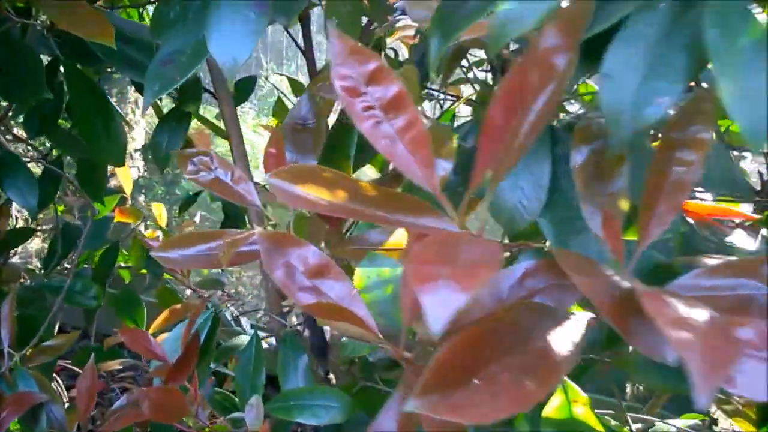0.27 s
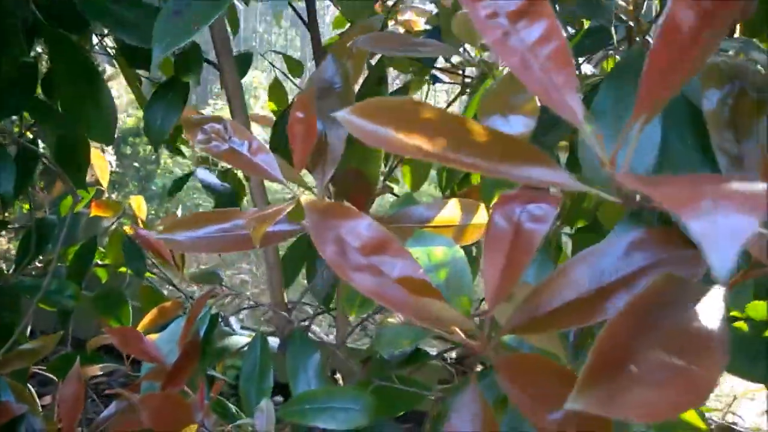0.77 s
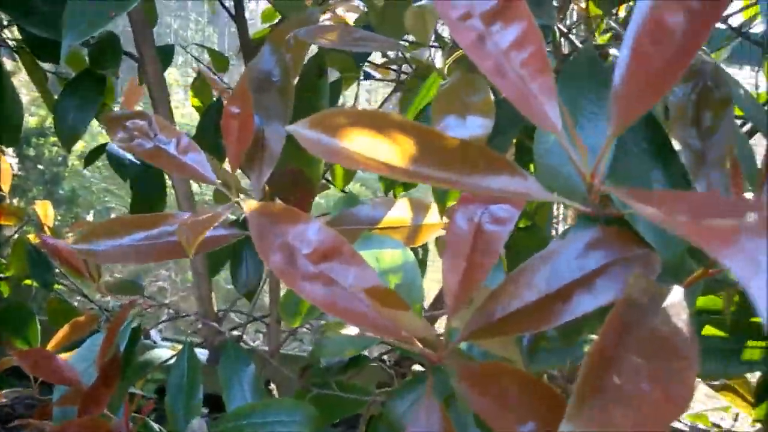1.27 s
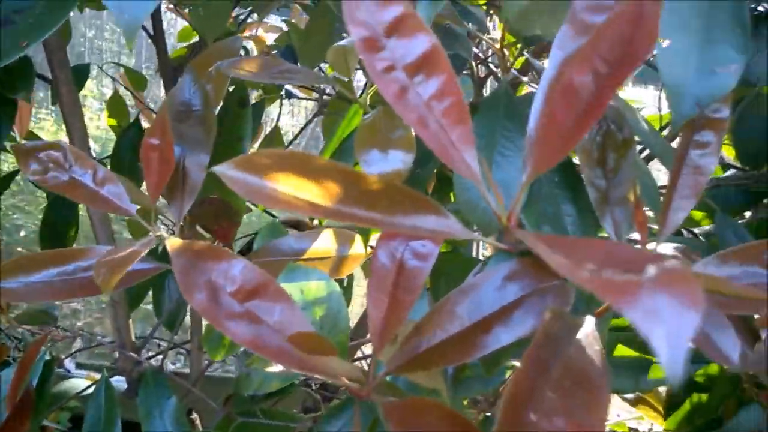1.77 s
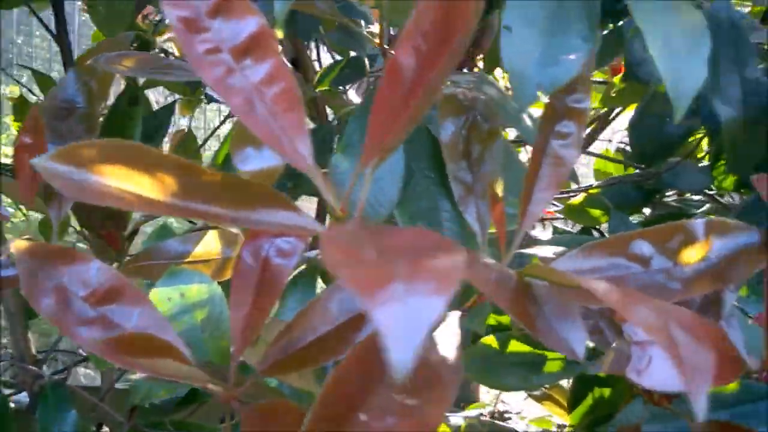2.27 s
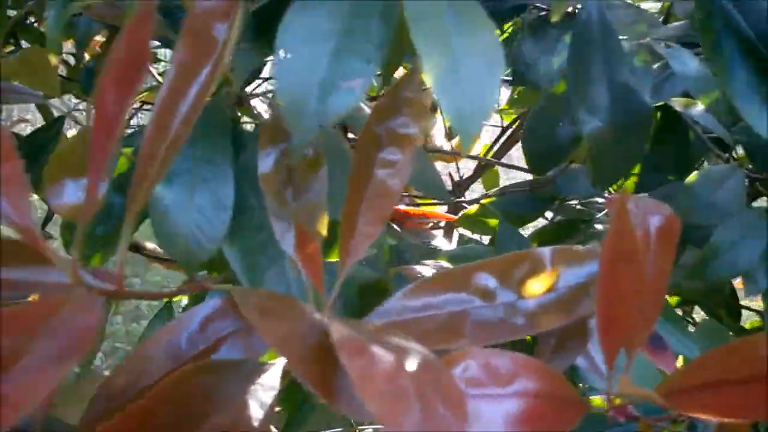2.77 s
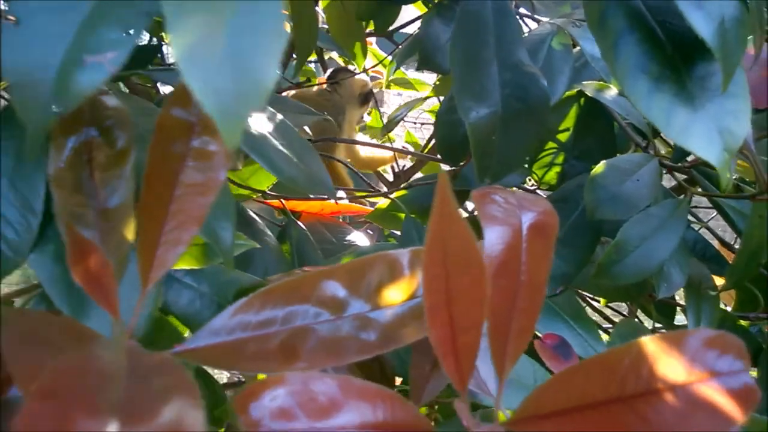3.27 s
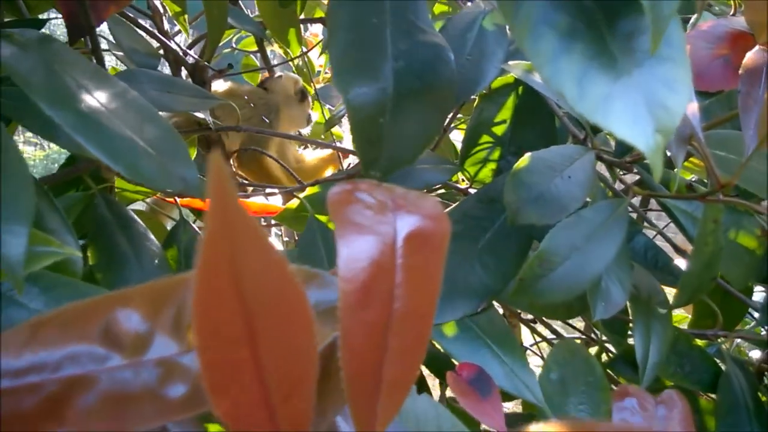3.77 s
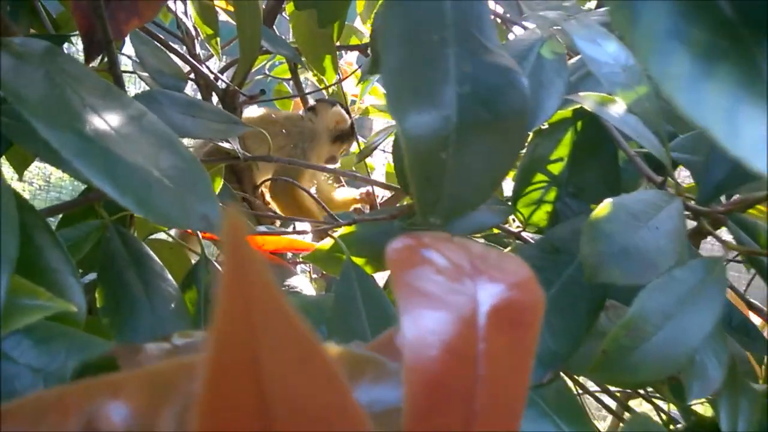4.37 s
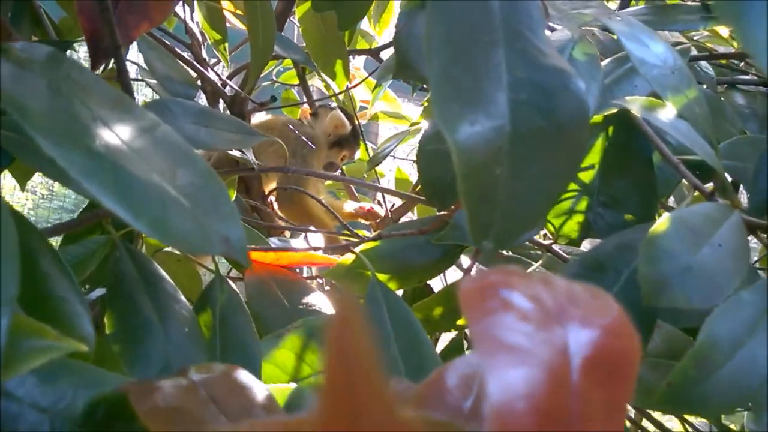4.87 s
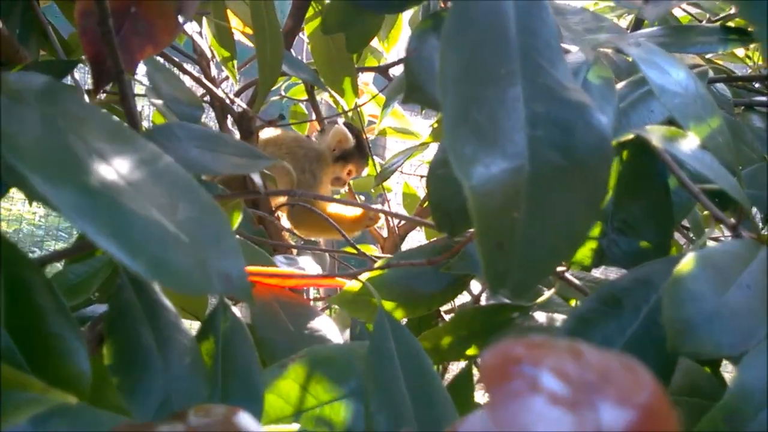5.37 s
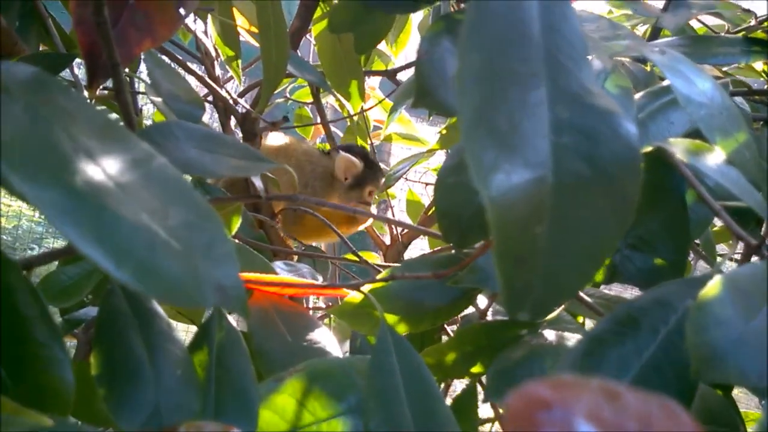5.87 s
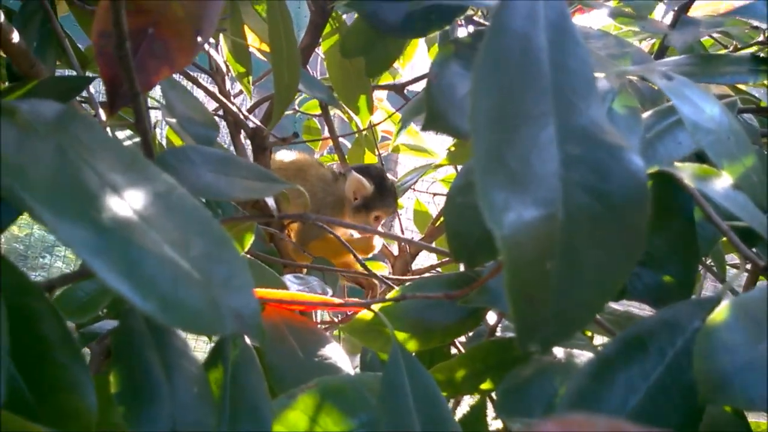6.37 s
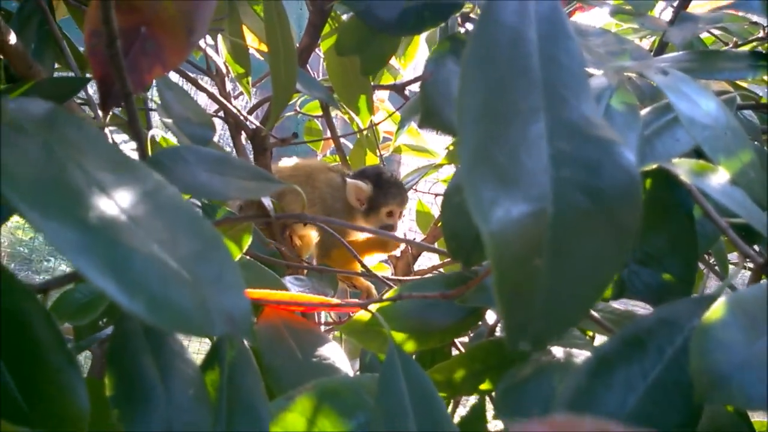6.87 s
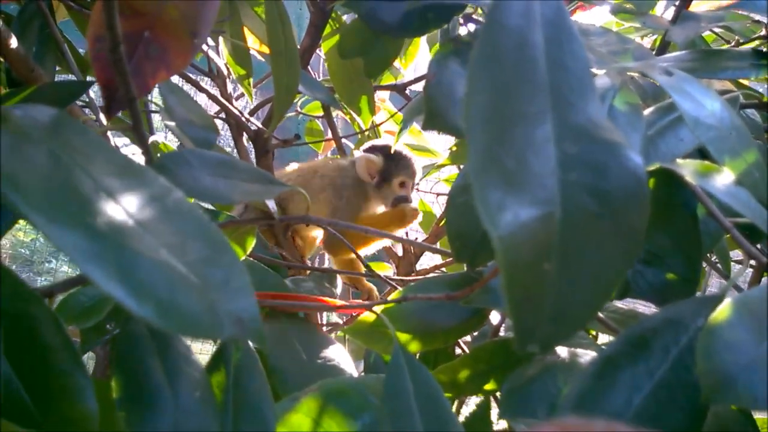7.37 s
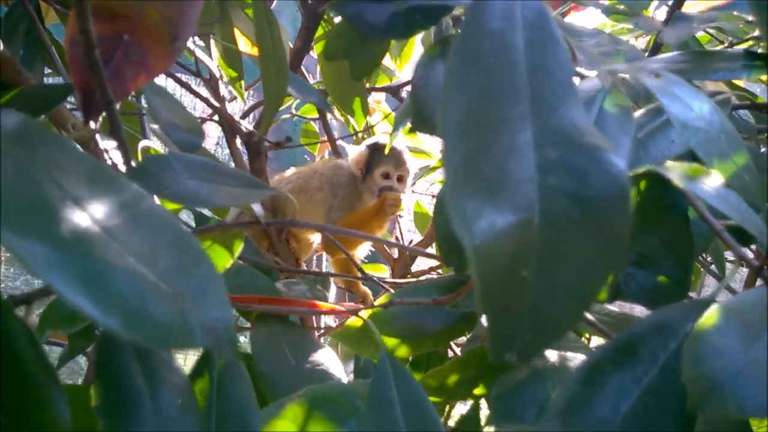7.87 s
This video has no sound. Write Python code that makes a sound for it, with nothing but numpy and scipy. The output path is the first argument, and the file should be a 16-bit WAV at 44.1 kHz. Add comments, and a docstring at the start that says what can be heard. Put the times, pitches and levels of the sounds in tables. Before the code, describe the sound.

A steady, wide outdoor rush with soft low rumble lies under everything, with a far twittering chorus blurred by trees. At 0.4 s a twig ticks, and around 0.55-0.8 s a bright high whistle swoops up, dips and flicks upward on the right. A short mew follows at 0.8 s and a thin whistle at 1 s. The rumble swells gently near 1.7 s; a sharp twig tick comes at 1.9 s. From 2.1 to 3.6 s a fast, grainy trill pulses about sixteen times a second, while a round low hoot at 2.45 s, a strong nasal buzz at 2.7-3.2 s and another hoot at 3.2 s overlap it. Crisp chips and whistles fill 3.5-4.8 s, with a short high swoop at 4.2 s. A faint mew and another swoop arrive at 5.6-5.9 s, then weaker scattered chirps until 8 s. Echoes suggest dense foliage.

```python
"""A steady outdoor rush and far chorus open the scene; a twig ticks, then a high whistle swoops.
Calls in dense foliage, most of them probably birds, follow: whistles, mews, hoots, buzzes, chips, a fast trill.
Voices are sines with drawn pitch and level; frequency and amplitude modulation makes the buzzes and trill.
Twigs are noise bursts in a resonance, the rush is shaped noise, and decaying noise spreads echoes of the trees."""
import sys
import numpy as np
from scipy import signal
from scipy.fft import rfft, irfft
from scipy.io import wavfile
from scipy.ndimage import uniform_filter1d

SR = 44100
rng = np.random.default_rng(int(sys.argv[2]) if len(sys.argv) > 2 else 0)


def int16_out(signal):
    """Quantize to a 16-bit WAV file."""
    q = np.round(np.clip(np.atleast_2d(signal).T, -1, 1) * 32767)
    wavfile.write(sys.argv[1], SR, q.astype(np.int16))


N = 358974
TIME = np.arange(N) / SR

# the note and the rasp of the trill share one pulse clock, with a pulse at the accent
TRILL_RATE_HZ, TRILL_ACCENT_S = 15.9, 3.49
TRILL_START_S, TRILL_LENGTH_S, TRILL_RELEASE_S = 2.12, 1.475, 0.07


def undb(db):
    """Convert level in decibels to amplitude, a factor of ten per 20 dB."""
    return 10 ** (np.asarray(db) / 20)


def unit(x):
    """Normalise the root-mean-square amplitude to 1."""
    return x / np.sqrt(np.mean(x ** 2))


def walk(rate, size):
    """Low-frequency random modulation: linearly joined Gaussian values, rate per second, spread near 1."""
    k = max(int(SR / rate), 1)
    steps = np.repeat(rng.standard_normal(size // k + 1), k)
    return 1.3 * uniform_filter1d(steps, k)[:size]


def along(points, hz):
    """Interpolate (frequency [Hz], value) points on a logarithmic frequency axis."""
    f, value = np.transpose(points)
    return np.interp(np.log(hz + 1), np.log(f), value)


def bend(u, first, middle, last):
    """Pitch glide: the parabola through the first, middle and last pitch [Hz]."""
    return np.polyval(np.polyfit([0, .5, 1], [first, middle, last], 2), u)


def tone(hz):
    """Sine oscillator: phase is the running integral of instantaneous frequency."""
    return np.sin(2 * np.pi * np.cumsum(hz) / SR)


def envelope(t, attack_s, release_s, edge_db=-20):
    """Amplitude envelope: attack, hold and release in dB below the held level."""
    attack = np.clip(1 - t / attack_s, 0, 1)
    release = np.clip(1 - (t[-1] - t) / release_s, 0, 1)
    return edge_db * (attack + release)


def swell(u, loudest, curve=2.4):
    """Swell shape: distance from the loudest moment of a note, 0 there and 1 at both ends."""
    return np.abs(np.interp(u, [0, np.clip(loudest, .05, .95), 1], [-1, 0, 1])) ** curve


def soft_ends(x, ramp_s=.002):
    """Short ramps at both ends prevent the broadband click of an abrupt edge."""
    t = np.arange(len(x)) / SR
    return x * np.clip(np.minimum(t, t[-1] - t) / ramp_s, 0, 1)


def whistle(hz, db, waver=0.0027, shimmer_db=1.37):
    """Near-pure tone: slight random frequency and amplitude modulation makes it tremble."""
    size = len(hz)
    voice = tone(hz * (1 + waver * walk(180, size)))
    return soft_ends(voice * undb(db + shimmer_db * walk(90.3, size)))


def add(bus, s, x, pan_db, echo_db, echo_side=0.26):
    """Level panning: feed left and right directly (rows 0, 1) and their echoes (rows 2, 3)."""
    tilt = np.array([pan_db, -pan_db]) / 2
    direct = unit(undb(tilt))
    echo = unit(undb(echo_side * tilt)) * undb(echo_db)  # the echo leans less to one side
    sends = np.append(direct, echo)
    i = max(int(s * SR), 0)
    x = x[:max(N - i, 0)]
    bus[:, i:i + len(x)] += sends[:, None] * x


def swoops(onset_db=-19, ease_s=0.049, flick_db=3, flatten=1.2, release_s=0.022, flick_rough_hz=110):
    """Frequency glide: pitch shoots to a crest, dips and, in long calls, flicks upward."""
    # swooping whistles: (crest time [s], rise [s], fall [s], crest to end [s], crest to loudest [s],
    # crest [Hz], flick [Hz], level before the call gain [dB], easing after the loudest moment [dB],
    # left minus right [dB], echo re direct [dB])
    swoop_calls = [ (.593, 0.048, 0.079, .235, 0.0037, 5000, 6500, -21.5, -7.5, -26, -3),
                   (4.228, 0.035, 0.08, 0.08, 0.0046, 6294, 6300, -21, -7.5, -13.5, -1.5),
                   (5.728, .045, .11, .235, 0.042, 5040, 6546, -25.5, -4.5, -27, -2), ]
    start_hz, dip_hz, dip_regain = 4200, 4470, .8  # share of the dip won back before the flick
    flick_after_s, flick_s, flick_sag_hz_per_s = .168, 0.016, 2500
    bus = np.zeros((4, N))
    for s, rise_s, fall_s, end_s, accent_s, crest_hz, flick_hz, db, ease_db, pan_db, echo_db in swoop_calls:
        t = np.arange(-rise_s, end_s, 1 / SR)
        rise = crest_hz + (start_hz - crest_hz) * np.abs(t / rise_s) ** 2.7
        height = .5 + .5 * np.tanh(flatten * np.cos(np.pi * t / fall_s)) / np.tanh(flatten)
        dip = dip_hz + (crest_hz - dip_hz) * height * np.where(t < fall_s, 1, dip_regain)
        since = np.maximum(t - flick_after_s, 0)
        flick = 1 - np.exp(-(since / flick_s) ** 1.3)
        hz = np.where(t < 0, rise, dip) * (1 - flick) + flick_hz * flick
        hz = hz - flick_sag_hz_per_s * since
        attack = onset_db * ((accent_s - t) / (accent_s + rise_s)) ** 2
        ease = ease_db * (1 - np.exp((accent_s - t) / ease_s))
        release = onset_db * np.clip(1 - (end_s - t) / release_s, 0, 1) ** 2
        level = db + np.where(t < accent_s, attack, ease) + flick_db * flick + release
        hz = hz + flick_rough_hz * flick * walk(400, len(t))  # the voice turns hoarse at the top
        add(bus, s - rise_s, whistle(hz, level), pan_db, echo_db)
    return bus


def trill_note(note_hz=4610, sag_hz_per_s=20, dip_hz=90, stray_hz=18, rough_hz=28, throb_db=3,
               uneven_db=2.5, flutter_rate_hz=85, flutter=0.55, echo_db=-5):
    """Amplitude modulation pulses a grainy note, hardest near the end; pitch sags between pulses."""
    note_db, attack_s, middle_sag_db = -33.5, 0.15, 2  # level before the call gain
    climax_s, climax_width_s, climax_db = 3.42, 0.12, 7  # the last pulses stand out
    t = np.arange(int(TRILL_LENGTH_S * SR)) / SR
    size = len(t)
    turn = np.pi * TRILL_RATE_HZ * (TRILL_START_S + t - TRILL_ACCENT_S)
    beat, gap = np.cos(turn) ** 4, np.sin(turn) ** 8
    climax = np.exp(-((TRILL_START_S + t - climax_s) / climax_width_s) ** 2)
    effort_db = -middle_sag_db * np.sin(np.pi * t / TRILL_LENGTH_S) ** 2
    db = note_db + effort_db + envelope(t, attack_s, TRILL_RELEASE_S)
    db = db + beat * (throb_db + climax_db * climax)
    db = db + uneven_db * (1 - beat / 2) * walk(150, size)
    hz = note_hz - sag_hz_per_s * t - dip_hz * gap
    hz = hz + stray_hz * walk(40, size) + rough_hz * walk(300, size)
    grain_cycle = tone(flutter_rate_hz * np.exp(.22 * walk(90, size)))
    grain = 1 + flutter * (1 - climax * beat) * grain_cycle  # the grain clears on the climax pulses
    bus = np.zeros((4, N))
    add(bus, TRILL_START_S, tone(hz) * grain * undb(db), 2, echo_db)
    return bus


def trill_rasp(sweep_hz=140, uneven=.35, stray_hz=90, grain_db=2.5, pulse_db=5.5, pulse_lead_s=0.026,
               echo_db=8):
    """Repeated fast down-sweeps spread into a rasp that surges before each pulse, blurred by leaves."""
    # loudness of the rasp along its sweep: (frequency [Hz], relative level [dB])
    colour = [(4250, -4.5), (4420, 4.5), (4900, 3.5), (5200, -5.5), (5600, -4.5), (6000, 1.5), (6300, 0)]
    low_hz, high_hz, ceiling_hz = 4200, 6130, 6460
    rise_hz_per_s = 220  # the sweeps start higher as the trill goes on
    rasp_db, attack_s, delay_s = -39, 0.019, 0.195  # the rasp joins in after the note
    t = np.arange(int((TRILL_LENGTH_S - delay_s) * SR)) / SR
    start, size = TRILL_START_S + delay_s, len(t)
    cycle = np.cumsum(sweep_hz * np.exp(uneven * walk(110, size))) / SR % 1
    top_hz = high_hz + rise_hz_per_s * t + stray_hz * walk(60, size)
    hz = top_hz + (low_hz - top_hz) * cycle + 60 * walk(200, size)
    db = rasp_db + envelope(t, attack_s, TRILL_RELEASE_S, edge_db=-14)
    pulse_time = start + t + pulse_lead_s - TRILL_ACCENT_S
    db = db + pulse_db * np.cos(2 * np.pi * TRILL_RATE_HZ * pulse_time)
    db = db + along(colour, hz) + grain_db * walk(130, size)
    # the rasp closes between sweeps, and a band-pass holds it to its band
    rasp = tone(hz) * np.sin(np.pi * cycle) ** .5 * undb(db)
    band = signal.butter(10, [low_hz, ceiling_hz], "band", fs=SR, output="sos")
    bus = np.zeros((4, N))
    add(bus, start, signal.sosfilt(band, rasp), 0, echo_db)
    return bus


def buzzes(pan_db=0.0, lead=2.43, shimmer_db=2.5, grit_db=0.7):
    """Joint frequency and amplitude modulation by a second oscillator puts sidebands around a tone."""
    # fluttering calls: (time [s], length [s], settled pitch [Hz], start above it [Hz], flutter rate [Hz],
    # pitch swing [Hz], throb [0-1], roughness [Hz], level before the call gain [dB],
    # fade, growing if negative [dB/s], echo re direct [dB])
    buzz_calls = [ (2.358, 0.61, 4980, -31.5, 68.2, 62, 0.5, 21, -33, -0.5, -1),
                  (2.524, 0.14, 3105, 281.5, 138, 129, 0, 106, -33.5, -22.5, 2),
                  (2.545, 0.12, 3740, 58, 139, 150, 0.2, 80, -41, -3, 2),
                  (2.637, 0.125, 2687, -35, 337, 89.7, 0.35, 3.6, -27.5, 15, -3),
                  (2.744, 0.49, 3226, 191, 327.8, 151, 0.4, 10, -18, 25.5, -1),
                  (3.385, 0.1, 3197, 270, 137, 150, 0.7, 110, -42, 70.5, 12),
                  (3.821, 0.11, 7080, -350, 133, 189, 0.1, 174, -44.5, -72, -2), ]
    settle_s, attack_s, release_s = 0.0355, 0.025, 0.025
    accent_db = 1.5  # the first moment is pushed harder
    bus = np.zeros((4, N))
    for (s, length, pitch_hz, above_hz, rate_hz, swing_hz, throb, rough_hz,
         db, fade_db, echo_db) in buzz_calls:
        t = np.arange(int(length * SR)) / SR
        size = len(t)
        push = np.exp(-t / settle_s)
        hz = pitch_hz + above_hz * push
        gain = undb(db + accent_db * push - fade_db * t + envelope(t, attack_s, release_s))
        flutter_hz = rate_hz * hz / pitch_hz + .25 * rough_hz * walk(120, size)
        cycle = 2 * np.pi * np.cumsum(flutter_hz) / SR
        voice = tone(hz + swing_hz * np.sin(cycle) + rough_hz * walk(400, size))
        throbbing = 1 + throb * np.sin(cycle + lead)  # lead in radians
        unevenness = undb(shimmer_db * walk(60, size) + grit_db * walk(350, size))
        add(bus, s, soft_ends(voice * gain * throbbing * unevenness), pan_db, echo_db)
    return bus


def hoots(onset_db=-26):
    """Low near-sinusoidal notes, their envelope a quick onset, a brief hold, then a fade."""
    # low hoots: (end of the onset [s], hold [s], first [Hz], middle [Hz], last [Hz], level [dB],
    # left minus right [dB], echo re direct [dB])
    hoot_calls = [ (2.457, 0.0022, 1726, 1615, 1665, -18.5, 7, -8),
                  (3.229, 0.026, 1616, 1653, 1652, -22, 10, -8), ]
    attack_s, release_s, fade_db = 0.036, 0.054, -25.5
    bus = np.zeros((4, N))
    for s, hold_s, first, middle, last, db, pan_db, echo_db in hoot_calls:
        t = np.arange(-attack_s, hold_s + release_s, 1 / SR)
        hz = bend(np.linspace(0, 1, len(t)), first, middle, last)
        onset = onset_db * np.clip(-t / attack_s, 0, 1) ** 1.1
        fade = fade_db * (np.maximum(t - hold_s, 0) / release_s) ** 1.6
        voice = whistle(hz, db + onset + fade, waver=0.0018, shimmer_db=0.6)
        add(bus, s - attack_s, soft_ends(voice, ramp_s=0.011), pan_db, echo_db)
    return bus


def mews(droop=.14, edge_db=-16, fundamental_db=-30.0):
    """Harmonic arches: a strong second harmonic over a weak fundamental that grows less with effort."""
    # arched mews: (time [s], length [s], crest of the second harmonic [Hz],
    # level before the call gain [dB], loudest moment [0-1], left minus right [dB], echo re direct [dB])
    mew_calls = [ (0.825, 0.22, 1963, -27, 0.57, -14.5, -7), (5.601, 0.21, 1957, -37, 0.63, -9, 3.5),
                 (7.51, 0.24, 1853, -41, 0.9, 25, 0), ]
    bus = np.zeros((4, N))
    for s, length, crest_hz, db, loudest, pan_db, echo_db in mew_calls:
        u = np.linspace(0, 1, int(length * SR))
        hz = crest_hz * (1 - droop * (2 * u - 1) ** 2)
        level = db + edge_db * swell(u, loudest)
        second = whistle(hz, level)
        fundamental = whistle(hz / 2, level / 2 + fundamental_db)
        add(bus, s, second + fundamental, pan_db, echo_db)
    return bus


def whistles():
    """Near-pure tones glide along gentle parabolas while their amplitude swells and fades."""
    # plain whistles: (time [s], length [s], first [Hz], middle [Hz], last [Hz],
    # level before the call gain [dB], swell [dB], loudest moment [0-1], left minus right [dB],
    # echo re direct [dB], pitch waver [share of pitch])
    whistle_calls = [ (0.468, 0.11, 4970, 4900, 5030, -47.5, 8, 0.5, -2, -6, .004),
                     (1.019, 0.165, 2850, 2960, 2924, -31.5, 19, 0.66, -19, -4.5, .003),
                     (1.982, 0.19, 3920, 3946, 3980, -39, 8.5, 0.3, -9.5, 1, 0.0041),
                     (2.22, 0.2, 825, 812, 793, -44, 7.5, 0.7, 7, -16, 0.003),
                     (2.23, 0.099, 1676, 1624, 1624, -42, 12.5, 0.3, 12.5, -14, .003),
                     (2.393, 0.15, 3960, 3866, 3930, -38, 4.5, 0.45, -15, 0.5, 0.0045),
                     (3.563, 0.091, 3690, 3830, 3817, -29.5, 3.5, 0.9, -12.5, -2, 0.0038),
                     (4.018, 0.052, 3056, 3086, 3070, -22.5, 4.5, 0.6, -9.5, -1.5, 0.0016),
                     (4.25, 0.15, 3246, 3490, 3485, -23.5, 16, 1, -28, -16, 0.0029),
                     (4.595, .14, 2880, 3027, 2990, -36, 9, 0.4, 4, -10, .0015),
                     (5.508, 0.11, 4960, 5020, 4960, -46, 14, 0.55, -2.5, -12, .0015),
                     (6.265, 0.089, 7200, 6880, 6750, -44, 16.5, 0.1, -25, 5.5, 0.014),
                     (6.299, 0.54, 4950, 5130, 5760, -54, 0, 0.8, -0.5, 5, .02),
                     (7.2, 0.34, 6640, 6680, 6632, -58, 5, 0.4, -7, 10, 0.014),
                     (7.81, 0.16, 1820, 1866, 1800, -50, 2, .5, 2, -4, .003),
                     (7.975, 0.15, 1850, 2340, 2450, -41.5, 6, 0.6, 2, -2, 0.0046), ]
    bus = np.zeros((4, N))
    for s, length, first, middle, last, db, swell_db, loudest, pan_db, echo_db, waver in whistle_calls:
        u = np.linspace(0, 1, int(length * SR))
        level = db - swell_db * swell(u, loudest, curve=2.3)
        add(bus, s, whistle(bend(u, first, middle, last), level, waver), pan_db, echo_db)
    return bus


def chips(shimmer_db=3.0):
    """Brief frequency sweeps, hoarse by random modulation; in many the echo outweighs the direct sound."""
    # short arched notes: (time [s], length [s], first [Hz], middle [Hz], last [Hz],
    # level before the call gain [dB], left minus right [dB], echo re direct [dB], hoarseness [Hz])
    chip_calls = [ (3.197, 0.03, 6700, 6500, 6250, -42, -3, 2, 160),
                  (3.383, 0.035, 3900, 3670, 3560, -48, -3.5, 8, 160),
                  (3.55, 0.014, 5700, 5380, 4500, -31.5, -5.5, 3, 55),
                  (3.756, 0.045, 2948, 3566, 3800, -33, -15.5, 4, 100),
                  (3.795, 0.033, 3900, 3490, 3060, -31.5, -19, 2, 90),
                  (3.861, 0.031, 7400, 6720, 5290, -43.5, -7, 12, 220),
                  (3.902, 0.02, 6420, 5370, 4350, -28.5, -10, 2, 50),
                  (4.165, 0.016, 6300, 5530, 4600, -39.5, -7, 12, 80),
                  (4.365, 0.061, 3720, 3530, 2910, -27.5, -13, -3, 110),
                  (4.437, 0.022, 3600, 3210, 2900, -29, -12.5, 2, 50),
                  (4.473, 0.02, 3525, 3180, 2910, -30, -11, 0.5, 50.3),
                  (4.514, 0.021, 3900, 3340, 2870, -29.5, -12.5, 2.5, 50),
                  (4.545, 0.024, 3600, 3320, 2860, -39.5, 0, 0, 70),
                  (4.645, 0.055, 3240, 3700, 3950, -46, -4, 2.5, 90),
                  (4.721, 0.042, 3590, 3334, 3170, -36.5, -7, -1, 70),
                  (6.126, 0.037, 2770, 2430, 2230, -41, 3, 0.5, 80),
                  (6.19, 0.11, 2550, 2780, 2710, -42, 3, -2, 130),
                  (6.432, 0.041, 4620, 4150, 3740, -43.5, 2, -3, 100),
                  (6.577, 0.053, 2900, 3170, 3300, -46, 2, -2, 90),
                  (6.63, 0.063, 3280, 2870, 2210, -39, 5, -6, 70),
                  (6.703, 0.05, 2730, 3050, 3130, -43.5, -1, -7, 100),
                  (6.817, .06, 6680, 6560, 6150, -43, 5, 3.5, 160),
                  (6.895, 0.049, 6200, 5840, 5000, -50.5, -7, 14.5, 160),
                  (6.998, 0.05, 6660, 7050, 6220, -43.5, 0, 8.5, 110),
                  (7.037, .085, 4000, 3580, 3230, -48, -6, 2, 150),
                  (7.089, 0.039, 6900, 6600, 6070, -44, -6, 3, 160),
                  (7.119, 0.078, 3450, 2910, 2230, -40.5, 7, -3, 60),
                  (7.195, 0.071, 2710, 3100, 2930, -42, 2, -7, 120),
                  (7.98, 0.045, 6605, 5700, 5400, -46, -8, 3, 130),
                  (8.053, 0.051, 7020, 5900, 4800, -39.5, -7.5, 3, 90), ]
    bus = np.zeros((4, N))
    for s, length, first, middle, last, db, pan_db, echo_db, rough_hz in chip_calls:
        u = np.linspace(0, 1, int(length * SR))
        hz = bend(u, first, middle, last) + rough_hz * walk(500, len(u))
        gain = undb(db + shimmer_db * walk(250, len(u))) * np.sqrt(4 * u * (1 - u))
        add(bus, s, tone(hz) * gain, pan_db, echo_db)
    return bus


def twigs(echo_db=-5):
    """Damped resonance: a decaying noise burst in one broad band makes a dry tick."""
    # twig ticks: (time [s], level [dB], centre [Hz], width [Hz], decay time constant [s])
    ticks = [(0.374, -34.5, 3970, 1210, 0.0049), (.472, -35.5, 7300, 1200, 0.005),
             (1.124, -35.5, 6800, 1990, 0.028), (1.919, -25.5, 3980, 5960, 0.0031)]
    bus = np.zeros((4, N))
    t = np.arange(int(.06 * SR)) / SR
    for s, db, hz, width_hz, decay in ticks:
        b, a = signal.iirpeak(hz, hz / width_hz, SR)
        crack = unit(signal.lfilter(b, a, rng.standard_normal(len(t))))
        add(bus, s, crack * np.exp(-t / decay) * undb(db), -2, echo_db)
    return bus


def trees(x, near_t60=0.13, far_t60=0.97, far_db=-5, gap_s=0.0074, wall_s=.062, wall_db=-15):
    """Scattering as convolution: leaves and trunks spray echoes, a wall returns one, the grove a tail."""
    t = np.arange(int(1.4 * SR)) / SR
    near = undb(-60 * t / near_t60)
    far = undb(far_db - 60 * t / far_t60)
    fade = (near + far) * (1 - np.exp(-t / gap_s))  # the echoes build up over the gap
    response = rng.standard_normal((2, len(t))) * fade / np.sqrt(np.sum(fade ** 2))
    response[:, int(wall_s * SR)] += undb(wall_db)
    return signal.fftconvolve(x, response, axes=1)[:, :N]


def chorus(count=1300, spread=.19, sweep=0.2467, direct_db=-16, scatter_db=3.0):
    """Superposition of many far chirps, heard almost only by their echo."""
    # far chorus: (time [s], typical echo level [dB], centre pitch [Hz])
    course = [(0, -45, 2940), (1.2, -46, 3450), (1.601, -63, 2790), (2.1, -42, 2817), (2.5, -68.5, 2850),
              (3.9, -45.5, 3027), (4.78, -44, 3200), (4.87, -41.5, 3870), (5.08, -48, 3576),
              (5.2, -53, 3500), (5.33, -40, 3585), (5.5, -41, 3483), (5.9, -50, 2966), (6.25, -46, 3020),
              (6.6, -45.5, 3258), (7.1, -43, 3146), (7.45, -51, 3435), (7.78, -41, 3620), (8.14, -52, 3680)]
    bus = np.zeros((4, N))
    times, levels, centres = np.transpose(course)
    u = np.linspace(0, 1, int(.03 * SR))
    for k, (late, pitch, slope, loud, side) in enumerate(rng.standard_normal((count, 5))):
        s = (k + late / 2) / count * N / SR
        offset = spread * np.clip(pitch, -1.4, 2.1)
        glide = sweep * np.sign(slope) * (u - .5)  # up or down at random
        hz = np.interp(s, times, centres) * np.exp(offset + glide)
        db = np.interp(s, times, levels) + scatter_db * loud + direct_db
        add(bus, s, tone(hz) * np.sin(np.pi * u) * undb(db), 4 * side, -direct_db)
    return bus


def air(level_db=-39.04):
    """Spectrally shaped noise: traffic and leaves as a wide rush whose low end wanders and swells once."""
    # spectrum of the rush: (frequency [Hz], relative spectral level [dB per Hz])
    spectrum = [(20, -30), (40, -11.5), (65, -4), (120, -1.5), (180, -3.5), (350, -4.5), (780, -10.5),
                (1100, -13.5), (1900, -13.5), (2800, -9.5), (3900, -17), (4700, -15.5), (5400, -17.5),
                (6300, -20), (7000, -18.5), (7500, -25.5)]
    # likeness of the two sides: (frequency [Hz], left-right correlation [-1 to 1])
    likeness_points = [(40, 0.53), (120, 0.19), (500, 0.18), (2000, 0.09), (7000, 0.046)]
    # balance of the two sides: (frequency [Hz], left minus right [dB])
    balance = [(40, 3.5), (80, 4), (180, 2.5), (400, 0), (2000, 0.5), (7000, 0.5)]
    swell_s, swell_width_s, swell_db = 1.7, 0.31, 2.5
    base_db, wander_db = 1.76, 0.6  # bass relative to the rest
    hz = np.fft.rfftfreq(N, 1 / SR)
    mid, side = rfft(rng.standard_normal((2, N)))
    likeness = np.clip(along(likeness_points, hz), -1, 1)
    sign = np.array([[1], [-1]])
    ports = mid * np.sqrt(1 + likeness) + sign * side * np.sqrt(1 - likeness)
    ports = ports * undb(along(spectrum, hz) + sign * along(balance, hz) / 2)
    low_share = 1 / (1 + (hz / 240) ** 4 + (70 / (hz + 1)) ** 4)
    surge = np.exp(-((TIME - swell_s) / swell_width_s) ** 2)
    rumble_db = base_db + swell_db * surge + wander_db * walk(2.2, N)
    rumble = irfft(ports * low_share, N) * undb(rumble_db)
    rush = rumble + irfft(ports * (1 - low_share), N)
    return rush / np.std(rush.mean(0)) * undb(level_db)


def scene(calls_db=0.5):
    """Linear superposition of callers, tree echoes (longest for the low hoots) and the outdoor rush."""
    calls = swoops() + mews() + whistles() + buzzes() + chips() + trill_note() + trill_rasp()
    bus = calls * undb(calls_db) + twigs() + chorus()
    low = hoots()
    low_echo = trees(low[2:], near_t60=0.17, far_t60=2.3, far_db=-9, wall_db=-21.5)
    return bus[:2] + trees(bus[2:]) + low[:2] + low_echo + air()


def record(dry):
    """Band limiting: an elliptic low-pass cuts the top steeply above 7480 Hz."""
    low_pass = signal.ellip(12, .2, 70, 7480, fs=SR, output="sos")  # ripple and stopband in dB
    return signal.sosfilt(low_pass, dry)


dry = scene()
out = record(dry)
int16_out(out)
```